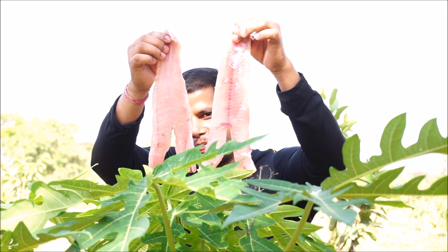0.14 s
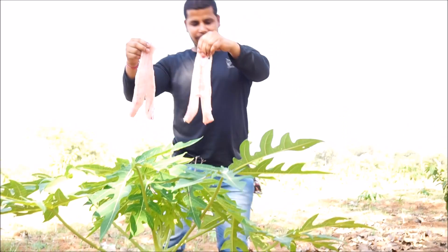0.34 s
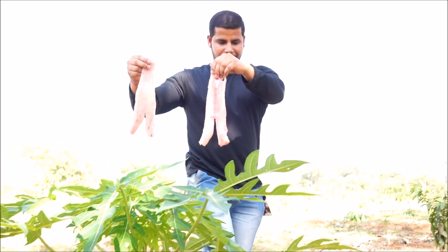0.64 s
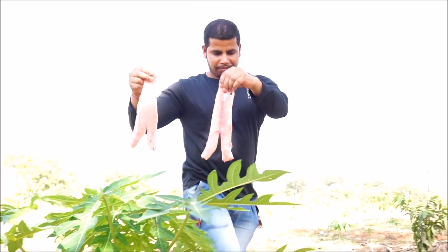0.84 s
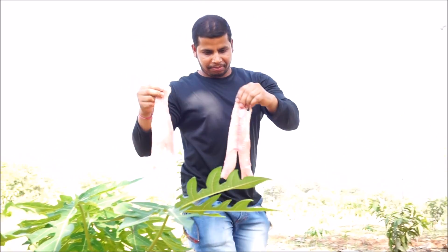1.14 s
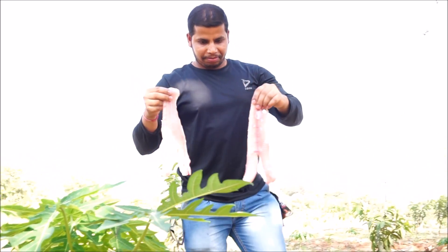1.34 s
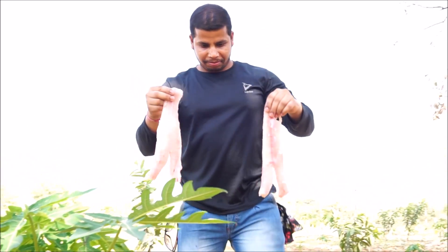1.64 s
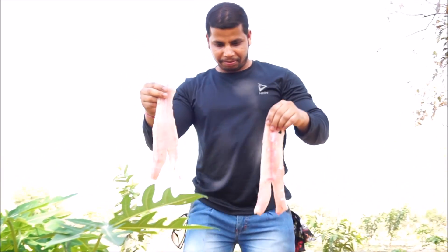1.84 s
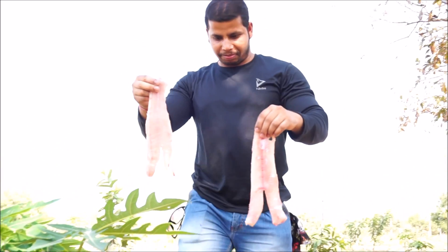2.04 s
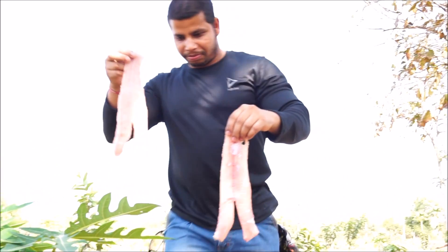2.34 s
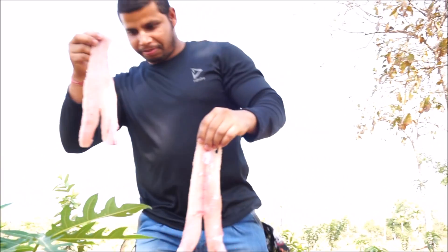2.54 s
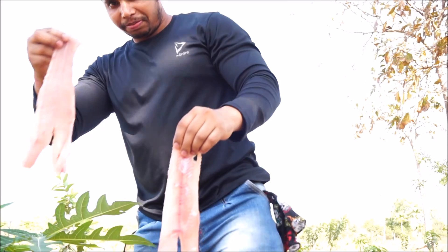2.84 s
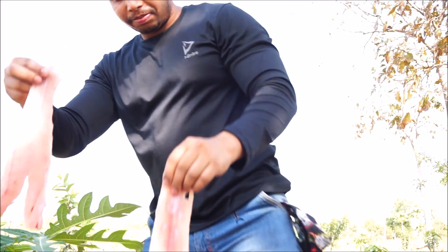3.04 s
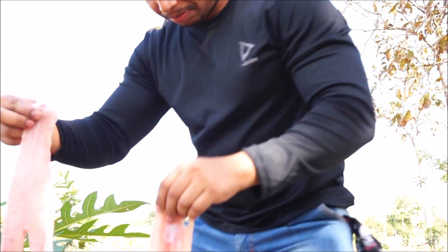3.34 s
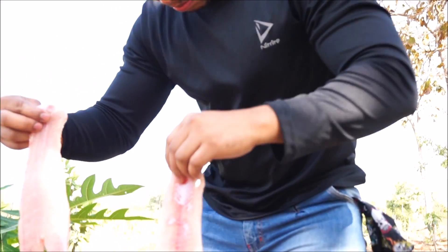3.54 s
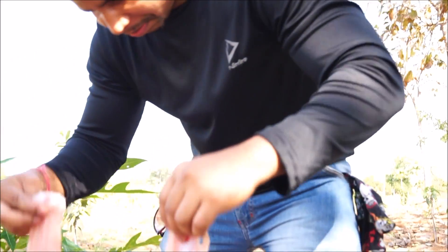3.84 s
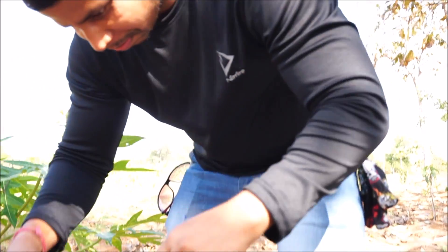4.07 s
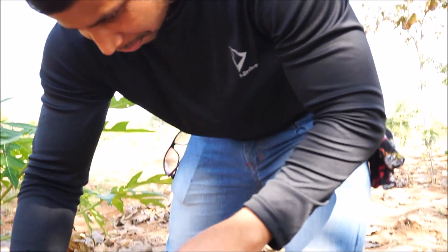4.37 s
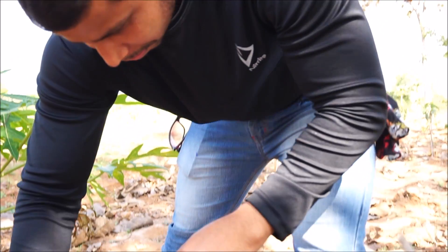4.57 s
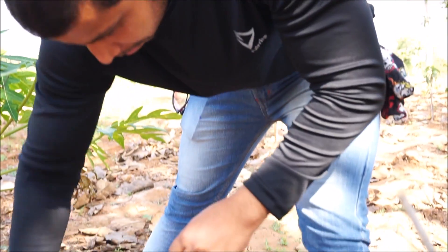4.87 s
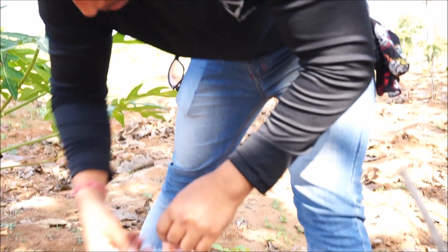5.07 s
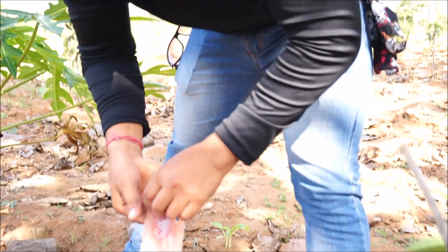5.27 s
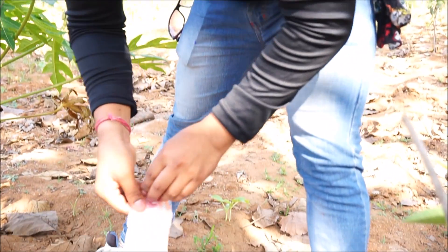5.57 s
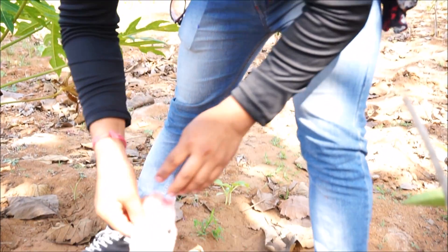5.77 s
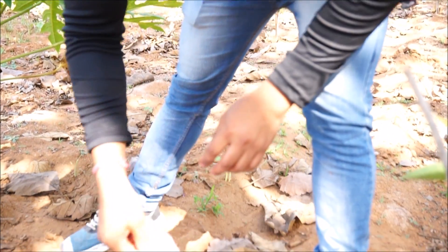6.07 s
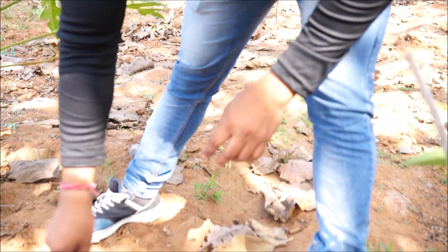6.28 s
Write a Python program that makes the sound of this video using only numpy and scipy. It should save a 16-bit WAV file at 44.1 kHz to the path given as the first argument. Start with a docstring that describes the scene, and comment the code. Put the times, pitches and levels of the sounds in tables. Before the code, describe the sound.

A low, flickering open-air hush runs throughout, swelling softly as foliage is stirred, with a very faint falling chirp at 0.1 s. Dry leaves start crushing and snapping at 0.3-0.6 s, close and crisp. After a short gap, crackles return at 0.85 s and build to a dense, bright crunch peaking around 1.3-1.4 s, then thin out. Sharp woody ticks click at 1.6 s, and a fainter one at 1.75 s. A quick crush with a very sharp snap comes at 2.35 s. Small crackles and a faint dull knock fall near 3.1-3.2 s, with light rustles to 3.65 s and a soft soil knock at 3.8 s. Another faint chirp sounds at 4.3 s, then a short duller crackle at 4.85 s. Mostly hush remains until a loud crush, hard twig cracks and a dull knock at 6.35-6.4 s. Close stereo microphone, dry outdoor space.

```python
"""Someone steps, shifts and crouches on dry leaves over bare soil, a step or two from a camera's two microphone ports.
From the start the open air hushes (flickering bands of noise) and leaves rustle (tiny cracks that ring leaf bands),
with a faint falling chirp early and another late. Soon leaves crush and snap (shaped bursts of cracks)
and twigs tick (damped sines). About halfway dull knocks begin (a few swelling modes with grit),
and the last of them lands among loud crushes and ticks near the end."""
import sys
import numpy as np
from scipy import signal
from scipy.fft import rfft, irfft, next_fast_len
from scipy.io import wavfile
from scipy.ndimage import uniform_filter1d

SR = 44100
rng = np.random.default_rng(int(sys.argv[2]) if len(sys.argv) > 2 else 0)


def wav_out(sig):
    """Save sig, one row per channel (or a flat mono array), as 16-bit PCM at SR to the path in sys.argv[1]."""
    wavfile.write(sys.argv[1], SR, np.round(np.clip(np.atleast_2d(sig).T, -1, 1) * 32767).astype(np.int16))


N = 282681
BANDS_HZ = 160 * 2 ** (np.arange(21) / 3)  # bands of the leaf sounds, three to the octave


def undb(db):
    """Decibels to an amplitude factor."""
    return 10 ** (np.asarray(db) / 20)


def over_hz(hz, table, axis=1):
    """Read a column of a spectrum table on a log-frequency axis."""
    table = np.array(table, float)
    return np.interp(np.log(np.maximum(hz, 1)), np.log(table[:, 0]), table[:, axis])


def over_time(table):
    """Columns of a curve table, one value a sample."""
    times, *columns = np.transpose(table)
    return [np.interp(np.arange(N) / SR, times, column) for column in columns]


def walk(rate):
    """Random levels held 1 / rate seconds and smoothed twice over that span."""
    hold = int(SR / rate)
    steps = np.repeat(rng.standard_normal(N // hold + 1), hold)
    return uniform_filter1d(uniform_filter1d(steps, hold), hold)[:N]


def pair(alike):
    """Left and right noise sharing a middle, with the given likeness (0 to 1)."""
    mid, side = rng.standard_normal((2, N))
    return np.sqrt((1 + alike) / 2) * mid + np.sqrt((1 - alike) / 2) * side * np.array([[1], [-1]])


# The two microphone ports: (frequency [Hz], phase lead of the right [rad], likeness of near sounds [0-1],
# likeness of the air [0-1], left minus right [dB])
PORT_SPACING = [(40, 0, .98, .6, -1), (200, .7, .96, .6, 0), (600, 1.0, .97, .6, .5),
                (1400, 1.0, .94, .5, 2.5), (3000, 1.05, .84, .22, .5), (5000, .6, .68, .25, 1.5),
                (7000, .15, .72, .3, 1.5), (15000, .1, .62, .4, 1.5)]


def ports(x, lead):
    """The ports shift phase and level against each other, by frequency; lead scales the phase."""
    size = next_fast_len(N + SR // 10)
    hz = np.fft.rfftfreq(size, 1 / SR)
    level = undb(over_hz(hz, PORT_SPACING, axis=4) / 2)
    left = level * np.exp(-.5j * lead * over_hz(hz, PORT_SPACING))
    return irfft(rfft(x, size) * np.array([left, 1 / left]), size)[:, :N]


# Spectrum of the open air: (frequency [Hz], relative density [dB])
AIR_SPECTRUM = [(15, -65), (25, -25), (120, -22.5), (277, -6.5), (317, -6.5), (373, -6), (516, 0.5),
                (887, 0), (1160, -4), (1480, -3), (2000, -10), (2990, -12.5), (3430, -18.5), (14400, -26.5),
                (16000, -28)]
# Foliage stirred by the movement, heard as departures of the level from its median:
# (time [s], level [dB], weight added to the lows and taken from the mids or back [dB])
WASH_SWELL = [(0.0, -60, 4.5), (0.36, -59.5, -3), (0.48, -50.5, -6.5), (0.89, -63, 3), (1.05, -52.5, -9),
              (1.34, -44, 1), (1.68, -50, -5), (2.21, -58, 0.5), (2.43, -47, -0.5), (2.6, -56, 9.5),
              (2.9, -58.5, -1), (3.36, -52, -3.5), (3.5, -50, 5), (3.84, -56.5, -2), (4.14, -60, -0.5),
              (4.39, -59, 7), (4.77, -54, -2), (4.9, -51, -1), (5.34, -59, 1.5), (5.6, -57, -3),
              (6.41, -56, -1.5)]
# How far each part of the wash follows it: (frequency [Hz], share of the level swell, share of the weight)
WASH_FOLLOW = [(151, 0.12, -0.21), (445, 0.78, 0.94), (1030, 0.6, -0.41), (2600, 0.73, 0.38),
               (5040, 0.07, 0.046)]
AIR_RMS_DB = -51.5  # at the ports' entrance


def air():
    """Foliage all round swells as leaves are stirred and flickers by band; the spectrum's ends swell little."""
    wash_db, weight_db = over_time(WASH_SWELL)
    swell_db = wash_db - np.median(wash_db)
    hz = np.fft.rfftfreq(N, 1 / SR)
    out = 0
    for centre in 25 * 2 ** (np.arange(20) / 2):
        # triangular half-octave bands that overlap to a flat power
        share = np.clip(1 - 2 * abs(np.log2(np.maximum(hz, 1) / centre)), 0, 1)
        noise = rfft(pair(over_hz(centre, PORT_SPACING, axis=3)))
        band = irfft(noise * np.sqrt(share) * undb(over_hz(hz, AIR_SPECTRUM)), N)
        flicker_db = np.interp(np.log(centre), np.log([300, 1500, 5000]), [3.5, 2.5, 1.2])
        level_db = over_hz(centre, WASH_FOLLOW) * swell_db
        level_db = level_db + over_hz(centre, WASH_FOLLOW, axis=2) * weight_db
        out = out + band * undb(level_db + flicker_db * walk(20))
    return out * undb(AIR_RMS_DB) / np.sqrt(np.mean(out ** 2))


def cracks(per_s, scatter_db):
    """Moments at which a leaf cell breaks, many small and few large; rms 1."""
    size = np.minimum(rng.exponential(size=N), 4)
    x = (rng.random(N) < per_s / SR) * undb(scatter_db * size)
    return x / np.sqrt(np.mean(x ** 2))


def tilt_db(hz, body_db, crisp_db):
    """Body fades in from 1780 Hz down, crispness from 3920 Hz up, each in full an octave on."""
    body = np.clip(np.log2(1780.0 / hz), 0, 1)
    crisp = np.clip(np.log2(hz / 3920.0), 0, 1)
    return body * body_db + crisp * crisp_db


# Leaves rustling under load: (time [s], level [dB], body relative to it [dB])
RUSTLE_CURVE = [(0.0, -61.5, 8), (0.29, -68, 9), (0.4, -43, -9), (0.66, -55, -7), (0.88, -57.5, 11),
                (1.03, -48, -18), (1.16, -35.5, -0.5), (1.28, -37.5, -3), (1.37, -28, 0), (1.66, -49, -2.5),
                (2.02, -55.5, 6), (2.33, -60, 2), (2.42, -45.5, 0), (2.56, -57, 11.5), (3.0, -60.5, 4),
                (3.37, -55, -5), (3.6, -56.5, -3), (4.02, -65.5, -7), (4.75, -75, 15), (4.9, -53, 6),
                (5.3, -72, 5), (6.41, -67, 12)]
RUSTLE_CRISP_DB = -4  # relative to the level


def rustle():
    """A dense shower of fine cracks follows the load in clumps; returns it with its body curve."""
    rustle_db, body_db = over_time(RUSTLE_CURVE)
    return cracks(per_s=9000., scatter_db=1.0) * undb(rustle_db + 1.78 * walk(110)), body_db


# Colour that ground and microphone give the leaf bands: (frequency [Hz], relative gain [dB])
LEAF_GAIN = [(59, -70), (100, -20), (271, -31), (343, -16), (570, -7), (691, -12.5), (1170, -4), (1520, -7),
             (2000, -11), (3050, -7.5), (3700, -17), (6020, -9), (7770, -15), (10500, -14), (16000, -18)]


def leaves():
    """The same cracks of rustle and breaks excite every band, each with its own random strength."""
    fine, body_db = rustle()
    shapes = break_shapes(cracks(per_s=6000., scatter_db=4.0), colour_db=3.0, ring_db=8.0, ring_octaves=0.13)
    out = 0
    for k, hz in enumerate(BANDS_HZ):
        # each band of the rustle flickers at random
        rustle_push = fine * undb(tilt_db(hz, body_db, RUSTLE_CRISP_DB) + 1.9 * walk(60))
        push = rustle_push * np.ones((2, 1))
        for start, burst, first, band_db in shapes:
            push[:, start:start + burst.shape[1]] += burst * undb(band_db[k])
        push = push * undb(3.05 * walk(90)) * pair(over_hz(hz, PORT_SPACING, axis=2))
        for start, burst, first, band_db in shapes:
            # the clean first crack comes 0.5 ms in, with its sign alternating from band to band
            push[:, start + SR // 2000] += (-1) ** k * first * undb(band_db[k])
        edges = [hz / 2 ** (1 / 6), hz * 2 ** (1 / 6)]
        resonance = signal.butter(2, edges, "band", fs=SR, output="sos")
        out = out + undb(over_hz(hz, LEAF_GAIN) + 10.5) * signal.sosfilt(resonance, push)
    return out


# Faint falling chirps, perhaps a far bird: (time [s], level [dB], start [Hz], end [Hz], length [s])
FAR_CHIRPS = [(0.084, -57.5, 2600, 2480, 0.12), (4.275, -54.5, 2560, 2500, 0.085)]


def chirps():
    """Thin tones that start quickly, sink and fade."""
    out = np.zeros(N)
    for s, db, from_hz, to_hz, length in FAR_CHIRPS:
        start = int(s * SR)
        u = np.arange(int(length * SR)) / (length * SR)
        phase = 2 * np.pi * np.cumsum(from_hz + (to_hz - from_hz) * u) / SR
        envelope = np.minimum(u / .08, 1) * (1 - u) ** 2
        out[start:start + len(u)] += np.sin(phase) * envelope * undb(db)
    return out


# Leaves crushed under a sole: (time [s], level [dB], body relative [dB], crispness relative [dB],
# ring [Hz], left minus right [dB], rise [ms], hold [ms])
SOLE_CRUSHES = [(0.3047, -31, -4.5, -1, 1204, 0, 1.5, 20), (0.334, -38, -7, -4, 5700, -7, 1.3, 25),
                (0.3569, -32.5, 3.5, 6, 8900, 3, 1.6, 1.8), (0.493, -40.5, -17, -0.5, 7400, 0, 1.5, 1.8),
                (0.928, -34.5, 1.5, -11, 806, -1, 17.5, 5.9), (0.976, -43.5, 0, -2, 910, -1, 1.5, 23),
                (1.16, -35, 5, 1.5, 9600, -2, 4, 3), (1.178, -38, 2, -4, 3140, -1, 5, 9),
                (1.227, -32, 3, 2, 5170, 0, 1.6, 2), (1.255, -34, 8.5, -2, 3230, -2, 5, 8.8),
                (1.283, -36.5, 2, 0, 1380, 0, 3, 3.7), (1.295, -27, -6, -4, 5640, -2, 5.4, 5.8),
                (1.332, -27, .5, -1, 2940, -3, 6, 15), (1.351, -22, -3.5, 0, 9580, 1.5, 7.5, 8.4),
                (1.372, -28, 3.5, -2, 2940, -4, 2.5, 11.4), (1.389, -33, 2, 1.5, 6000, 1, 4.4, 10),
                (1.42, -39.5, 8, 1, 2970, -6, 3.1, 6.3), (1.446, -39, 2, -3, 2870, -2, 8, 31),
                (1.494, -47, 8, -2, 1720, -3, 3.1, 5.6), (1.667, -50, 16, 0, 760, 0, 2.4, 10),
                (1.905, -51, -8, -2.5, 10500, -1, 2.3, 30), (2.331, -33, -4, -11, 1650, 1, 18, 17.6),
                (2.357, -34, -0.5, 3.5, 2640, 2, 1.5, 13.2), (2.389, -41.5, -1, -33, 1600, -1, 3, 7.7),
                (3.17, -42.5, 13.5, -24, 1260, -2, 3.5, 3), (3.181, -51, 5, -18, 1510, -1, 2, 21),
                (3.329, -43.5, -9, -13, 1480, 5, 2.3, 6), (3.343, -47.5, -12, -8, 3140, 2, 2.5, 7.3),
                (3.363, -47, 9, -27, 650, 0, 3, 5.4), (3.432, -44, 16, -32, 774, -6, 3.1, 4.5),
                (3.454, -46.5, 8.5, -21, 1620, -4, 4.7, 12), (3.522, -55, 13.5, -19, 830, -4, 3, 18),
                (3.548, -43.5, -6, -13, 3040, 2, 7, 9.9), (3.628, -55.5, 15.5, -11, 810, 2, 3.9, 14),
                (4.286, -58, 17.5, -26, 900, -3, 6.3, 7.4), (4.821, -47.5, 11, -35, 1000, 1, 1, 15),
                (4.839, -36, 15, -13, 563, 1.5, 1.3, 22), (4.863, -40.5, 0, -30, 870, -5, 3.4, 5.9),
                (4.881, -32.5, 4, -7.5, 1590, 1, 1, 4.4), (4.897, -44, -13, -10, 5370, 3, 2.1, 9.8),
                (6.347, -22.5, 4, -2, 1140, 3.5, 5.6, 4.4), (6.357, -19, -0.5, -10, 645, 2.5, 1.9, 10.2),
                (6.372, -29, 7, -14, 860, 9, 2, 3.2), (6.379, -38, -9, 0.5, 3470, 4, 1.5, 10.4)]


def crushes():
    """Presses with their own rise and hold; a longer press fades longer. Rise, hold, t60 in seconds."""
    return [(*row[:6], row[6] / 1000, row[7] / 1000, 0.019 + 6.75 * row[7] / 1000) for row in SOLE_CRUSHES]


# Leaves that snap at once: (time [s], level [dB], body relative [dB], crispness relative [dB],
# ring [Hz], left minus right [dB], fade t60 [s])
LEAF_SNAPS = [(0.3856, -41.5, 1, 2, 3100, 4, .061), (0.409, -48, 9, -2, 1280, 1, 0.041),
              (0.436, -45, -6, -5, 10680, -5, 0.069), (0.453, -44.5, 1, 2, 9500, 8, .03),
              (0.462, -43, -19, 0, 3270, -3, 0.047), (0.5689, -36, 6, -1, 2060, 1, .02),
              (0.607, -50, 3, -2, 2330, 0, 0.18), (0.8597, -39.5, 2, -3, 1060, 1, 0.052),
              (0.8746, -41, -3, -5.5, 5330, 0, 0.12), (0.907, -44.5, -4, -18, 2500, 0, 0.22),
              (0.9564, -37, -10, 4.5, 9100, 0, 0.08), (0.9713, -37.5, 5, 8, 7800, 1, .023),
              (1.089, -32.5, 0.5, -1, 2940, 1, 0.061), (1.122, -37, -1, -1, 3140, -2, 0.07),
              (1.131, -36, -1, 0, 2580, 1, 0.029), (1.204, -46.5, 11, 7, 6630, 0, 0.11),
              (1.098, -40, -6, 3, 5700, 1, .025), (1.317, -44, 6, -10, 5290, -4, .029),
              (1.247, -33.5, 0, 2, 7240, 1, .053), (1.04, -51, -10, 7, 6550, 0, .03),
              (1.585, -53, -10, 8.5, 7750, 0, .05), (1.596, -51, -15, 8.5, 2330, 2, 0.11),
              (1.603, -36, -13, -19, 2640, -1, 0.053), (1.624, -42, -3, -5, 2530, -2, 0.093),
              (1.749, -47, -1, -31, 2650, 3, 0.041), (1.893, -43.5, -18, -5, 4780, -3, 0.038),
              (2.264, -49, 7.5, -25, 1340, 1, .04), (2.351, -27.5, -25, -2.5, 3040, 2, 0.062),
              (3.0628, -47, -21, 0, 3700, 1, 0.063), (3.109, -41, -11, -8.5, 3530, 5, .048),
              (3.209, -34, -4, -11, 2870, 3.5, 0.037), (3.378, -44, 4, -28, 686, -7, 0.088),
              (3.502, -51, 9, -28, 1200, -3, 0.027), (3.59, -48, 12.5, -8, 5440, 0, 0.044),
              (3.645, -57.5, -10, 6.5, 7800, 3, 0.023), (3.4385, -53, 4, -18, 895, -4, .03),
              (4.878, -41, 10, -8, 2350, 11, .03), (5.031, -57, 11, -3, 1640, 3, 0.048)]
SNAP_RISE_S, SNAP_HOLD_S = 0.64e-3, 1.3e-3


def snaps():
    """Single leaves give way suddenly, all with one short rise and hold. Rise, hold, t60 in seconds."""
    return [(*row[:6], SNAP_RISE_S, SNAP_HOLD_S, row[6]) for row in LEAF_SNAPS]


def break_shapes(grain, colour_db, ring_db, ring_octaves):
    """Each break swells, holds and fades, favouring one ring: (start, shower, first crack, dB per band)."""
    shapes = []
    for s, db, body_db, crisp_db, hz, pan, rise, hold, t60 in snaps() + crushes():
        start = int(s * SR)
        t = np.arange(min(int((rise + hold + t60) * SR), N - start)) / SR
        shape = np.minimum(t / rise, 1) * undb(-60 * np.maximum(t - rise - hold, 0) / t60)
        burst = shape * grain[start:start + len(t)]
        # the break's energy is set, its grains are chance
        burst = burst * np.sqrt(np.sum(shape ** 2) / np.sum(burst ** 2))
        sides = undb([[pan / 2], [-pan / 2]])
        # a break leads with one clean crack, up to 9 times the shower's rms, weaker the slower its rise
        first = 9.0 * np.exp(-(rise / 0.0012) ** 2) * sides[:, 0]
        ring = ring_db * np.exp(-(np.log2(BANDS_HZ / hz) / ring_octaves) ** 2)
        colour = colour_db * rng.standard_normal(len(BANDS_HZ))
        band_db = db + tilt_db(BANDS_HZ, body_db, crisp_db) + ring + colour
        shapes.append((start, burst * sides, first, band_db))
    return shapes


# Twigs and stalks that ring as they crack: (time [s], level [dB], ring [Hz], left minus right [dB], t60 [s])
TWIG_TICKS = [(0.4114, -36, 1260, -4, .03), (.569, -28.5, 2080, -3, .02), (1.5965, -32, 2330, -4, 0.018),
              (1.6053, -25, 2680, -1, 0.013), (1.609, -35, 2550, -1, .018), (1.624, -22, 2460, 2, 0.0095),
              (1.750, -37, 2670, 0, 0.022), (2.3528, -15, 2990, 3, .012), (3.064, -39, 3630, -3, 0.0085),
              (3.1088, -31, 3490, 2, 0.0072), (3.2108, -34.5, 1540, -2, 0.023), (3.346, -38, 3130, 2, .03),
              (4.8465, -24, 570, 1, 0.045), (6.3509, -21, 1144, 1, 0.042), (4.8792, -25, 2290, 5, 0.018),
              (6.3605, -10, 691, -5, 0.038), (6.3815, -22.5, 3670, 5, 0.044)]


def ticks():
    """One damped mode for each cracking twig."""
    out = np.zeros((2, N))
    for s, db, hz, pan, t60 in TWIG_TICKS:
        start = int(s * SR)
        t = np.arange(min(int(t60 * SR), N - start)) / SR
        onset = 1 - np.exp(-2 * hz * t)
        ring = np.sin(2 * np.pi * hz * t) * onset * undb(db - 60 * t / t60)
        out[:, start:start + len(t)] += ring * undb([[pan / 2], [-pan / 2]])
    return out


# Dull knocks of a shoe or something set down on soil: (time [s], level [dB], pitch [Hz],
# overtone tilt [dB per octave], left minus right [dB], half the time to the envelope's peak [ms])
SOIL_KNOCKS = [(3.172, -35, 173, -2, 1, 1.1), (3.7874, -27, 480, 0, -1.5, 1.05),
               (6.403, -16.5, 338, -5.5, -0.5, 1.26)]
# Modes of the knock, coloured by ground and microphone: (multiple of the pitch, level [dB])
MODES_OF_KNOCK = [(1, 0), (2.25, -2.5), (3.201, 0.5), (5.8, -13.5)]


def knocks():
    """A soft push swells a few modes, coloured by ground and microphone, that die at once; grit crunches along."""
    out = np.zeros((2, N))
    grit_band = signal.butter(2, [500, 2200], "band", fs=SR, output="sos")
    for s, db, hz, over_db, pan, swell in SOIL_KNOCKS:
        start = int(s * SR)
        t = np.arange(min(SR // 20, N - start)) / SR
        ring = sum(undb(mode_db + over_db * np.log2(multiple)) * np.sin(2 * np.pi * hz * multiple * t)
                   for multiple, mode_db in MODES_OF_KNOCK)
        grit = signal.sosfilt(grit_band, rng.standard_normal(len(t)))
        u = t / (2 * swell / 1000)
        push = (u * np.exp(1 - u)) ** 2
        out[:, start:start + len(t)] += (ring + undb(-2.5) * grit) * push * undb([[db + pan / 2], [db - pan / 2]])
    return out


def scene():
    """Near sounds scatter briefly off ground and plants; the air comes from all round."""
    near = leaves() + ticks() + knocks()
    t = np.arange(int(.15 * SR)) / SR
    scatter = rng.standard_normal((2, len(t))) * undb(-43.0 - 60 * t / .1)  # t60 0.1 s
    # leaves and twigs scatter only short waves
    thin = signal.sosfilt(signal.butter(2, 800, "high", fs=SR, output="sos"), near)
    near = near + signal.fftconvolve(thin, scatter, axes=1)[:, :N]
    # little of the near leaves, ticks and knocks is heard below 243 Hz
    near_low_cut = signal.butter(3, 243, "high", fs=SR, output="sos")
    near = signal.sosfilt(near_low_cut, near)
    # sound from all round widens the phase lead
    return ports(near, lead=1) + ports(air() + chirps(), lead=1.63)


def record(dry):
    """The camera cuts the top steeply above 15750 Hz."""
    return signal.sosfilt(signal.ellip(12, .2, 90, 15750, fs=SR, output="sos"), dry)


dry = scene()
out = record(dry)
wav_out(out)
```